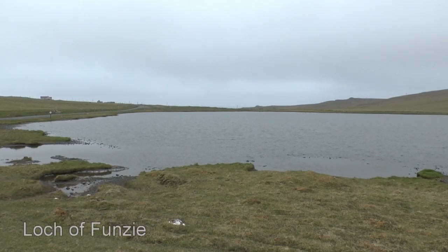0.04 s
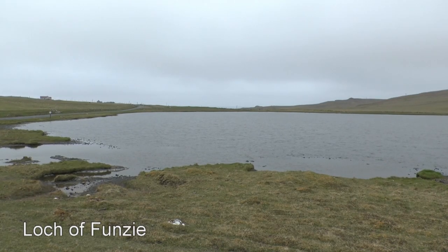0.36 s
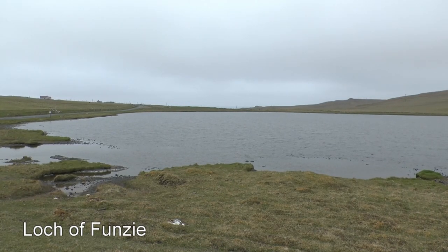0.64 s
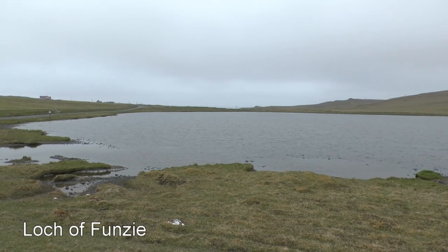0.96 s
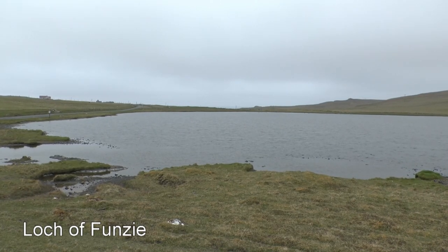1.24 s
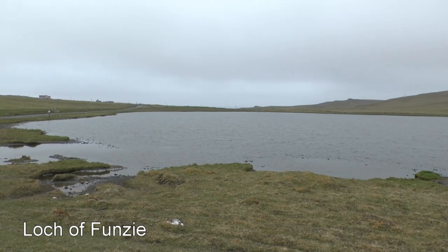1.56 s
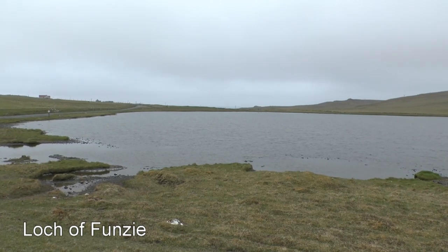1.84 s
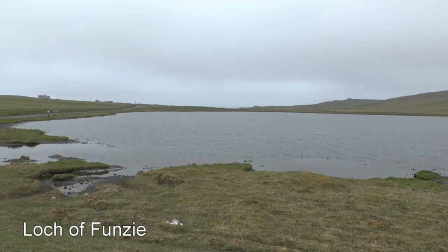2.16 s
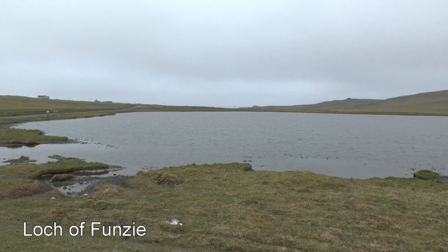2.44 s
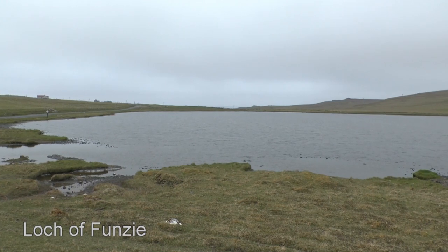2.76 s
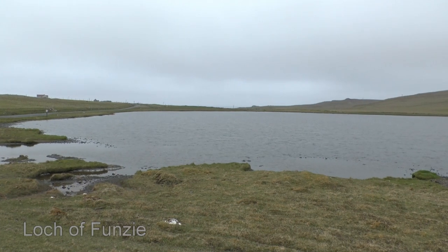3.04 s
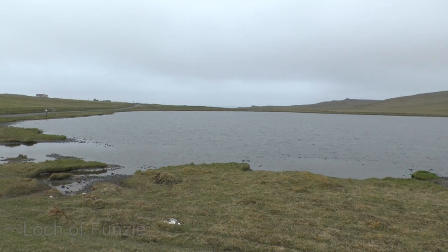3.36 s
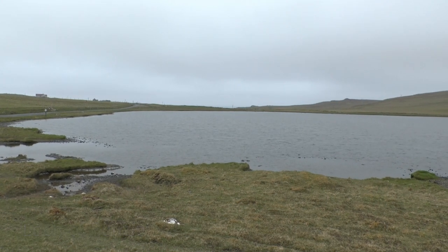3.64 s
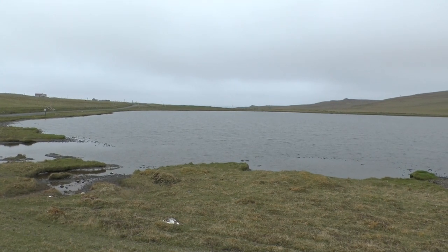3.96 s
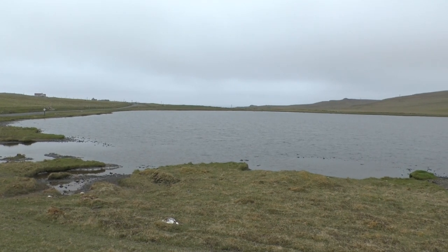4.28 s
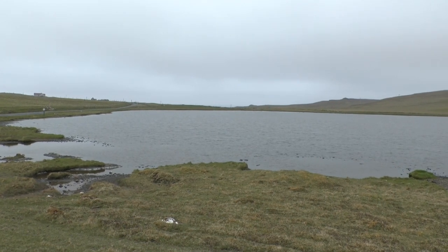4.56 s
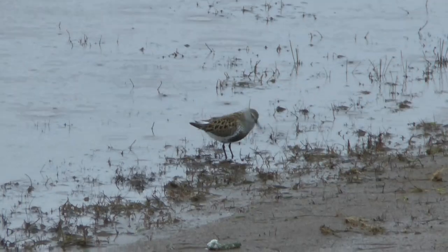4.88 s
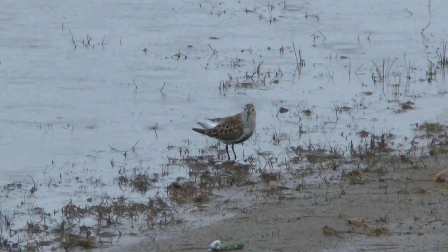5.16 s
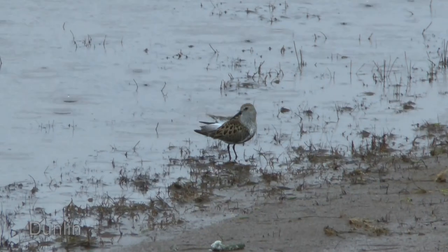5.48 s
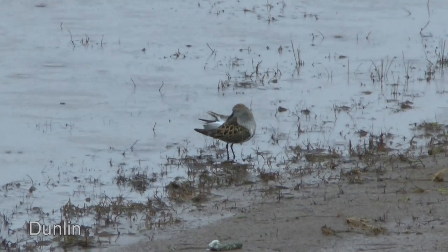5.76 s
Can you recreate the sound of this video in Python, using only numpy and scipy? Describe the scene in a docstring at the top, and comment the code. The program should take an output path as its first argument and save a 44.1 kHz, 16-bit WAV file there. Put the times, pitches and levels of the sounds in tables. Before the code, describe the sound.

On an open lake shore, small wading birds give rapid, overlapping trills and whistles, arching in pitch and sometimes rasping, with a faint flock farther off. Gusts of wind rumble directly on the microphone. After about four and a half seconds everything cuts off abruptly. In the calm that follows, one bird twitters faintly among a few stray calls, small wet ticks and soft knocks over a distant hum.

```python
"""Small waders trill and whistle on a loch shore while wind buffets the microphone.
Each call is an arch of pitch from the syrinx, chopped by a valve into pulses that turn from pure
to rasping when forced. A flock calls farther along the shore; eddies rumble right on the microphone.
After an abrupt break the wind is gone: one bird twitters faintly, with a few stray calls, among
small wet ticks and soft knocks over a distant hum."""
import sys
import numpy as np
from scipy import signal
from scipy.fft import rfft, irfft, next_fast_len
from scipy.io import wavfile
from scipy.ndimage import uniform_filter1d, map_coordinates

SR = 44100
rng = np.random.default_rng(int(sys.argv[2]) if len(sys.argv) > 2 else 0)


def transcribe(u):
    """Save the signal u as a 16-bit wav file named by the first command-line argument.

    u: samples, shape (n,) or (channels, n), limited to [-1, 1]; the rate is SR.
    q: integer samples, one column per channel.
    """
    v = np.clip(np.atleast_2d(u).T, -1, 1)
    q = np.round(v * 32767).astype(np.int16)
    wavfile.write(sys.argv[1], SR, q)


N = 265261
TIME = np.arange(N) / SR
BREAK_START_S, BREAK_END_S = 4.661, 4.699
SCOOP_S = .028  # time constant of a trill's opening swing up in pitch

# colour of the rasp in a wader's throat: (frequency [Hz], relative level [dB])
THROAT_COLOUR = [(900, -5), (1250, -17), (1480, 1), (1630, -14), (1850, -2), (2200, -5), (2700, 9),
                 (3300, -8), (4000, 0), (4900, -8), (5800, -18), (8000, -40)]


def gain_of(db):
    return 10 ** (np.asarray(db) / 20)


def unit_rms(x):
    return x / np.sqrt(np.mean(x ** 2) + 1e-20)


def add(mix, start_s, sound):
    part = mix[max(round(start_s * SR), 0):][:len(sound)]
    part += sound[:len(part)]


def coloured(x, points):
    """Filters x by a curve of (frequency [Hz], relative level [dB]) points, to rms 1."""
    point_hz, db = np.transpose(points)
    size = next_fast_len(len(x))
    hz = np.fft.rfftfreq(size, 1 / SR)
    curve = gain_of(np.interp(np.log(hz + 1), np.log(point_hz + 1), db))
    return unit_rms(irfft(rfft(x, size) * curve, size)[:len(x)])


def noise(size, points):
    return coloured(rng.standard_normal(size), points)


def wander(size, per_s):
    """A smooth curve of rms 1 through per_s random values a second."""
    knots = rng.standard_normal(4096)
    return unit_rms(map_coordinates(knots, [np.arange(size) * per_s / SR], order=3, mode="grid-wrap"))


def faded(x, fade_s):
    return x * signal.windows.tukey(len(x), min(2 * fade_s * SR / len(x), 1))


def call_time(length_s):
    """Seconds into a call, and the same as a share of its length."""
    t = np.arange(0, length_s, 1 / SR)
    return t, t / length_s


def syrinx(hz, overtone_db):
    """A bird's voice: a nearly pure tone with a weak octave."""
    phase = 2 * np.pi * np.cumsum(hz) / SR
    return np.sqrt(2) * (np.sin(phase) + gain_of(overtone_db) * np.sin(2 * phase))


def valve(cycle, share, edge):
    """Opens for a share of each cycle, with soft edges."""
    return np.sin(np.pi / 2 * np.clip(np.minimum(cycle, share - cycle) / edge, 0, 1)) ** 2


def side_tones(hz, drift=.045, jitter=0.0218, patchy_db=5.5):
    """A forced syrinx also rings at other multiples of its pitch, each coming and going."""
    # tones of a forced voice: (frequency [multiple of pitch], relative level [dB])
    partials = [(.54, -7.5), (.68, -11), (.82, -4), (0.922, -6), (1.099, 3.5), (1.252, -1.5), (1.5, -7.5)]
    size = len(hz)
    out = np.zeros(size)
    for multiple, db in partials:
        side_hz = multiple * hz * (1 + drift * wander(size, 22) + jitter * wander(size, 450))
        strength = gain_of(db + patchy_db * wander(size, 31.4))
        out += strength * np.sin(2 * np.pi * np.cumsum(side_hz) / SR)
    return out / np.sqrt(uniform_filter1d(out ** 2, size=1500) + 1e-12)  # they share a fixed effort


def trill(hz, tone_db, rasp_db, per_s, open_share, chirp=.05, jitter=0.0077, stumble=0.028,
          leak=0.27, uneven_db=0.96, droop_s=0.0238, strain_s=0.0031):
    """A valve chops the tone into pulses; when forced, each pulse starts with a harsh burst."""
    size, open_share = len(hz), np.clip(open_share, .25, 1)
    cycle = np.cumsum(per_s * (1 + stumble * wander(size, 85))) / SR % 1
    strength = gain_of(uneven_db * wander(size, 112.1))
    gate = (leak + valve(cycle, open_share, edge=0.16)) / np.sqrt(open_share)
    harshness = 1 / (1 + gain_of(tone_db - rasp_db))
    # the pitch arches within each pulse, and droops through it where the call falls away
    within = np.minimum(cycle / open_share, 1)
    falling = np.clip(-np.gradient(np.log(hz)) * SR, 0, 9)
    arch = chirp * (1 - open_share / 2) * (np.sin(np.pi * within) - np.pi / 4)
    bend = arch + droop_s * falling * (.5 - within)
    shake = (jitter + strain_s * falling) * wander(size, 199.4) + 0.039 * harshness * wander(size, 1100)
    tone = gain_of(tone_db) * gate * syrinx(hz * (1 + bend + shake), overtone_db=-30)
    burst = unit_rms(.25 + valve(cycle, share=0.38, edge=.2))
    hiss = coloured(burst * rng.standard_normal(size), THROAT_COLOUR)
    rasp = .9 * burst * side_tones(hz * (1 + bend)) + .45 * hiss
    return faded((tone + gain_of(rasp_db) * rasp) * strength, fade_s=0.0019)


def trill_gesture(length_s, top_hz, scoop, fall, tone_db, crest, rasp_start_db, rasp_end_db,
                  buzz_s, later_per_s, later_open):
    """One arch of pitch and one swell; any opening buzz gives way to clearer pulses."""
    edge_s, plunge = 0.014, .3  # this share of the fall comes in the last instants
    swell_db, swell_width, release_db = 10, 0.24, 5
    buzz_per_s, buzz_open, handover_s = 100, 0.65, 0.01
    t, progress = call_time(length_s)
    opening, closing = np.exp(-t / edge_s), np.exp((t - length_s) / edge_s)
    drop = (1 - plunge) * progress ** 3.4 + plunge * closing
    hz = top_hz * (1 - scoop * np.exp(-t / SCOOP_S) - fall * drop)
    swell = np.exp(-.5 * ((progress - crest) / swell_width) ** 2)
    level_db = tone_db + swell_db * (swell - 1) - release_db * closing
    buzz = (buzz_s > 0) * (1 - np.tanh((t - buzz_s) / handover_s)) / 2
    # the rasp thins in mid-call once the buzz is over, and at both ends
    clearing_db = 4.5 * (1 - buzz) * np.sin(np.pi * progress) ** 2 + 8 * (opening + closing)
    rasp_db = rasp_start_db + (rasp_end_db - rasp_start_db) * progress - clearing_db
    per_s = later_per_s + (buzz_per_s - later_per_s) * buzz
    open_share = later_open + (buzz_open - later_open) * buzz
    return hz, level_db, rasp_db, per_s, open_share


def shore_echo(x, t60_s=0.55, wet_db=-17):
    """Banks and ripples scatter a thin echo back to the microphone."""
    t = TIME[:SR // 2]
    taps = rng.standard_normal(len(t)) * (rng.random(len(t)) < 2000 / SR)
    taps *= (t > .004) * gain_of(-60 * t / t60_s)
    return x + gain_of(wet_db) * signal.fftconvolve(x, taps / np.linalg.norm(taps))[:N]


def near_birds():
    """The nearer birds, their calls overlapping in the open air."""
    # pulsed calls: (start [s], length [s], top pitch [Hz], scoop [share of pitch],
    # fall [share of pitch], tone at crest [dB], crest [share of length], rasp at start [dB],
    # rasp at end [dB], opening buzz [s], later pulse rate [1/s], later opening [share of cycle])
    trills = [ (0.0, 0.17, 3183, 0.017, 0.16, -44.5, 0.11, -60, -42.5, 0.026, 66, 0.99),
              (0.074, 0.064, 2910, 0, 0.061, -48.5, .5, -60, -58, 0.044, 72, 0.8),
              (.135, 0.31, 3212, 0.096, 0.26, -34, 0.73, -48.5, -57, 0.12, 68, .82),
              (0.339, 0.31, 3348, 0.078, .35, -37, 0.84, -48.5, -50, 0.11, 68, 0.68),
              (0.824, 0.35, 3243, 0.18, 0.34, -41.5, 0.32, -43.5, -55.5, 0, 70, 0.63),
              (1.114, 0.25, 3160, 0.26, 0, -43, 0.2, -48.5, -61, 0.24, 110, 0.4),
              (1.282, 0.32, 3230, 0.014, 0.083, -49, .25, -53.5, -53, 0.21, 116, 0.3),
              (1.565, 0.24, 3154, 0.063, 0.061, -44.5, 0.31, -58, -66, 0, 45, 0.82),
              (1.8, 0.082, 2740, 0.0071, 0.39, -52, 0.65, -49, -44, 0, 72, .62),
              (1.951, 0.22, 3135, 0.18, 0.48, -48, 0.35, -78, -54, 0.0048, 37.4, 0.65),
              (2.041, 0.31, 3340, 0.016, 0.27, -44, 0.46, -50, -51.5, 0.17, 73, 0.64),
              (2.691, 0.21, 2963, 0.17, .17, -46, .78, -52, -47.5, 0.005, 74, 0.75),
              (2.879, 0.55, 3558, .1, 0.17, -44, 0.9, -51, -53.5, .15, 65, 0.79),
              (3.045, .31, 3173, 0.13, 0.37, -39.5, 0.63, -51, -47.5, 0.0053, 64, 0.87),
              (3.145, .082, 3056, 0.013, 0.36, -44.5, .55, -56, -40, 0.089, 78, 0.8),
              (3.33, .15, 3240, .05, 0.24, -41.5, 0.61, -51.5, -41.5, 0, 70, 1),
              (3.47, 0.26, 3180, .02, 0.13, -45, 0.37, -42, -50.5, 0.17, 72, 0.77),
              (3.87, 0.19, 2730, 0, .03, -48.5, 0.62, -53.5, -46, 0.22, 110, 0.9),
              (3.93, 0.21, 3117, 0.0042, 0.11, -47, 0.41, -50, -62, 0, 35, .75),
              (4.081, 0.14, 3226, 0, 0.2, -49, 0.45, -50, -54, 0.086, 79, 0.3),
              (4.224, 0.18, 2730, .02, 0.1, -58, 0.86, -48.5, -54.5, 0.28, 62, 0.6),
              (4.37, 0.13, 3545, 0.019, 0.035, -48, 0.9, -51, -63, 0.021, 68, 0.88),
              (4.541, 0.12, 3210, 0.079, 0.072, -43, 0.51, -53.5, -40.5, 0.17, 110, .4),
              (4.758, 0.11, 4040, .07, 0.069, -47.5, 0.72, -63, -60, 0, 78, 0.57),
              (5.83, 0.083, 3170, 0.11, 0.18, -59, 0.64, -82, -69, 0.017, 70, 0.7)]
    # clean notes: (start [s], length [s], top pitch [Hz], scoop [share of pitch],
    # sag [share of pitch], level at start [dB], level at end [dB])
    whistles = [ (0.035, 0.029, 1780, 0.029, 0.029, -57, -56), (0.47, .038, 2760, 0.092, .01, -52, -42),
                (0.628, 0.23, 3220, 0.0046, .1, -47.5, -53.5), (0.67, 0.2, 3830, .1, 0.14, -50, -45),
                (0.687, 0.051, 4200, 0, 0.067, -57, -51), (2.323, 0.042, 3500, 0.082, 0.11, -49, -58),
                (2.526, 0.023, 3440, 0.18, 0, -45.5, -51), (2.551, 0.16, 2080, 0.11, 0.099, -50.5, -59),
                (2.592, .18, 3844, .07, .11, -40, -48.5), (3.709, 0.054, 3710, .11, 0.04, -45, -58),
                (4.406, .16, 3760, 0.15, .11, -48, -42), (4.557, 0.084, 3270, 0, 0.032, -42, -41),
                (4.73, 0.034, 3650, 0.015, 0.064, -49, -48), (5.697, 0.043, 5480, 0.26, 0.38, -54, -56.5)]
    out = gain_of(1) * twitter()
    for start, *call in trills:
        add(out, start, trill(*trill_gesture(*call)))
    for start, *call in whistles:
        add(out, start, whistle(*call))
    return shore_echo(out)


def gust_power():
    """The power of the rumble and of the flutter, each summed over bell-shaped gusts."""
    # gusts on the microphone: (time [s], rumble peak [dB], half-width [s], relative flutter peak [dB])
    gusts = [(.04, -33, 0.063, -64), (.3, -32.5, 0.051, -51), (.55, -44.5, 0.14, -66),
             (0.712, -27, 0.041, -52), (.99, -30, 0.042, -51.5), (1.138, -30, 0.045, -60),
             (1.368, -29.5, 0.1, -73), (1.68, -29, 0.095, -48), (1.811, -20.5, 0.029, -46.5),
             (1.937, -21, 0.042, -39.5), (2.02, -27.5, .04, -57), (2.191, -30, 0.069, -51.5),
             (2.42, -33.5, 0.18, -58), (2.581, -28, 0.065, -63), (2.74, -33, 0.11, -68),
             (2.95, -38.5, 0.087, -60), (3.27, -35.5, 0.089, -58), (3.521, -31, 0.027, -53),
             (3.618, -28, 0.034, -47), (3.79, -34, 0.069, -59), (4.13, -36, 0.072, -59),
             (4.385, -28.5, 0.059, -62), (4.637, -29, 0.016, -46)]
    rumble, flutter = np.zeros((2, N))
    for time, rumble_db, width_s, flutter_db in gusts:
        bell = np.exp(-((TIME - time) / width_s) ** 2)
        rumble += gain_of(rumble_db) ** 2 * bell
        flutter += gain_of(flutter_db) ** 2 * bell
    return rumble, flutter


def wind(breeze_db=-38, flutter_db=-3, deep_db=-54, lumps_db=0.73):
    """Eddies rumble on the microphone; gusts add a higher flutter."""
    # colour of the buffeting: (frequency [Hz], relative level [dB])
    buffet_colour = [(12, -63), (25, -18), (50, -16), (80, -4), (135, 2.5), (200, 1), (260, -8),
                     (340, -20.5), (480, -49), (580, -45.5), (670, -40.5), (770, -40), (900, -71),
                     (2000, -110)]
    rumble_power, flutter_power = gust_power()
    strength = np.sqrt(gain_of(breeze_db) ** 2 + rumble_power) * gain_of(lumps_db * wander(N, 21.55))
    rumble = noise(N, buffet_colour)
    rumble /= np.sqrt(uniform_filter1d(rumble ** 2, size=3000))  # evened, so the gusts shape it
    flutter = noise(N, [(150, -36), (330, 18), (480, 2), (680, 1.5),
                        (1000, -12), (2500, -52), (8000, -65)])
    # the largest eddies roll on between the gusts
    deep = gain_of(deep_db) * noise(N, [(8, -35), (25, -5), (55, -8), (110, -20), (400, -93)])
    return deep + strength * rumble + gain_of(flutter_db) * np.sqrt(flutter_power) * flutter


def open_air(level_db=-53):
    """A soft, steady wash behind the wind."""
    # air over the windy shore: (frequency [Hz], relative level [dB])
    colour = [(300, 17), (500, 3), (580, 12.5), (660, 2), (770, 8), (900, -4.5), (1100, 3.5), (1300, 2),
              (1480, 6), (3000, 0.5), (5000, 4.5), (8000, -1), (10500, -0.5), (15700, -6)]
    return gain_of(level_db) * noise(N, colour)


def whistle(length_s, top_hz, scoop, sag, start_db, end_db,
            jitter=0.0068, scoop_s=0.0114, side_db=-17, throb_hz=95, flutter_db=1.7):
    """A nearly clean note that scoops up, sags evenly and throbs toward its end."""
    t, progress = call_time(length_s)
    hz = top_hz * (1 - scoop * np.exp(-t / scoop_s) - sag * progress)
    tone = syrinx(hz * (1 + jitter * wander(len(t), 431)), overtone_db=-40)
    tone += gain_of(side_db) * side_tones(hz)
    tone *= 1 + 0.104 * t / t[-1] * np.sin(2 * np.pi * throb_hz * t)
    level_db = start_db + (end_db - start_db) * progress + flutter_db * wander(len(t), 117.5)
    return faded(tone * gain_of(level_db), fade_s=0.0014)


def far_flock(base_db=-58, spread_db=4, count=110):
    """Birds farther along the shore throw in short, faint, throbbing glides, rich in echo."""
    out = np.zeros(N)
    for when, pitch, length, slope, effort in rng.random((count, 5)):
        t = TIME[:int((.025 + .05 * length) * SR)]
        progress = t / t[-1]
        arch = np.sin(np.pi * progress)
        start_hz = 1600 + 2100 * pitch
        hz = start_hz * (1 + (0.28 * slope - .22) * progress + 0.0504 * arch)
        throb = 1 + .8 * np.sin(2 * np.pi * (60 + 35 * effort) * t)
        note = syrinx(hz * (1 + 0.018 * wander(len(t), 380)), overtone_db=-52) * throb * arch
        throat_db = np.interp(start_hz, *np.transpose(THROAT_COLOUR))
        add(out, when * BREAK_START_S, gain_of(base_db + throat_db / 2 + spread_db * effort) * note)
    return shore_echo(out, wet_db=1.5)


def tick(hz, rise_cycles=0.44, rustle_db=-23, rustle_s=0.005):
    """A wet snap of two or three cycles and a brief rustle after it."""
    t = TIME[:900]
    age = t * hz / rise_cycles
    snap = age * np.exp(1 - age) * np.sin(2 * np.pi * hz * t)
    rustle = noise(len(t), [(500, -21), (1600, 18), (4400, 2), (8000, -3), (15000, -33)])
    return snap + gain_of(rustle_db) * np.exp(-t / rustle_s) * rustle


def wet_ticks(spread_db=7, per_bout=8):
    """Single clear ticks, and bouts of tiny ones in the calm, all free of echo."""
    # clear wet ticks: (time [s], level [dB], pitch [Hz])
    clear_ticks = [(0.751, -32.5, 2620), (4.763, -39, 2370), (4.791, -25, 4000), (4.8254, -17.5, 2990),
                   (4.978, -38, 2200), (5.0142, -35, 1620), (5.0947, -27, 2320), (5.1045, -33, 2300),
                   (5.1799, -29, 2950), (5.201, -31.5, 3200), (5.2396, -21.5, 2630), (5.3081, -28, 2400),
                   (5.36, -34, 2300), (5.374, -36, 2200), (5.482, -38, 2100), (5.5465, -30, 3300),
                   (5.791, -39, 3900), (5.9151, -29.5, 2680), (5.925, -31, 3300), (5.947, -29.5, 1960),
                   (5.971, -20, 3260)]
    # soft pattering: (start [s], length [s], top level [dB])
    bouts = [(4.755, .1, -36), (4.948, 0.19, -35), (5.162, 0.27, -35), (5.448, 0.11, -39),
             (5.66, 0.16, -41.5), (5.921, .05, -36.5)]
    out = np.zeros(N)
    for time, db, hz in clear_ticks:
        add(out, time, gain_of(db) * tick(hz))
    for start, length_s, db in bouts:
        for k, (when, size, pitch) in enumerate(rng.random((per_bout, 3))):
            time = start + length_s * (k + when) / per_bout
            add(out, time, gain_of(db + spread_db * (size - 1)) * tick(1600 + 1800 * pitch))
    return out


def knocks():
    """Dull, heavily damped bumps."""
    # soft knocks and plops: (time [s], level [dB], pitch [Hz], decay [s])
    bumps = [(1.635, -40, 600, 0.0024), (2.3528, -37.5, 1800, 0.0016), (2.614, -45, 1400, 0.0018),
             (4.104, -41.5, 610, 0.0015), (5.003, -41.5, 115, 0.01), (5.02, -41, 70, 0.014),
             (5.672, -38, 63.5, 0.0084), (5.9555, -39.5, 720, 0.002)]
    out, t = np.zeros(N), TIME[:SR // 4]
    for time, db, hz, decay_s in bumps:
        envelope = t / decay_s * np.exp(1 - t / decay_s)
        add(out, time, -gain_of(db) * envelope * np.sin(2 * np.pi * hz * t))
    return out


def calm_air(level_db=-51):
    """A low, steady wash with no wind on the microphone."""
    # air in the calm: (frequency [Hz], relative level [dB])
    colour = [(20, 9), (55, 16), (200, 21), (390, 18.5), (500, 7.5), (560, 14), (660, 4.5), (780, 12),
              (900, -3), (1450, 2.5), (3000, 4), (8000, -3.5), (11000, -4), (15700, -7.5)]
    return gain_of(level_db) * noise(N, colour)


def distant_hum(waver=0.00278):
    """Two faint wavering tones, far off."""
    # tones of the hum: (frequency [Hz], level [dB])
    tones = [(382, -68), (763, -69.5)]
    out = np.zeros(N)
    for hz, db in tones:
        phase = 2 * np.pi * np.cumsum(hz * (1 + waver * wander(N, 12))) / SR
        out += gain_of(db) * np.sqrt(2) * np.sin(phase)
    return out


def twitter(top_hz=4240, scoop=0.072):
    """A lone bird repeats its phrase: two falling notes and a rising buzz."""
    # phrases: (buzz start [s], buzz length [s], relative buzz level [dB], relative lead level [dB])
    phrases = [(5.053, 0.089, -56, -54.5), (5.289, .085, -53, -57), (5.536, 0.081, -54, -54)]
    # a high slide and a pip: (time before the buzz [s], length [s], pitch [Hz], sag [share of pitch])
    lead_notes = [(.063, 0.0193, 4880, 0.134), (.018, 0.014, 4070, .1)]
    out = np.zeros(N)
    for start, length_s, db, lead_db in phrases:
        for lead_s, note_s, hz, sag in lead_notes:
            add(out, start - lead_s, whistle(note_s, hz, 0, sag, lead_db, lead_db, jitter=.018))
        t, _ = call_time(length_s)
        hz = top_hz * (1 - scoop * np.exp(-t / SCOOP_S))
        buzz = trill(hz, db, rasp_db=db - 6.5, per_s=88, open_share=.85,
                     chirp=0.053, jitter=0.021, stumble=0.14)
        add(out, start, buzz)
    return out


def scene():
    """One microphone: the windy shore, a moment of silence, then the calm."""
    before = np.clip((BREAK_START_S - TIME) / 0.002, 0, 1)
    after = np.clip((TIME - BREAK_END_S) / 0.0019, 0, 1)
    windy = wind() + open_air() + far_flock()
    calm = calm_air() + distant_hum()
    foreground = near_birds() + wet_ticks() + knocks()
    return (before * windy + after * calm + (before + after) * foreground)[None]


def record(dry):
    """The recorder's band limit cuts off the highest treble."""
    lowpass = signal.firwin(511, cutoff=15750, window=("kaiser", 9), fs=SR)
    return signal.oaconvolve(dry, lowpass[None], "same")


dry = scene()
out = record(dry)
transcribe(out)
```